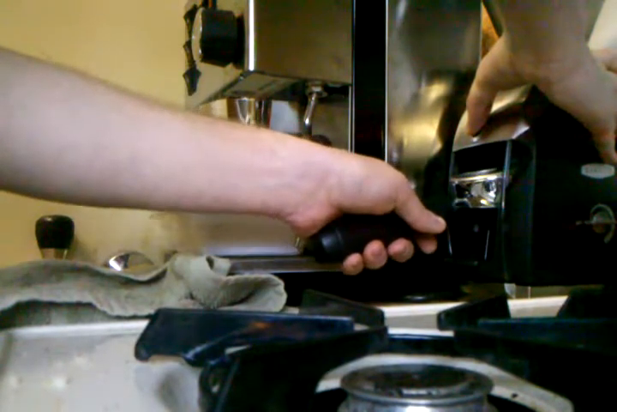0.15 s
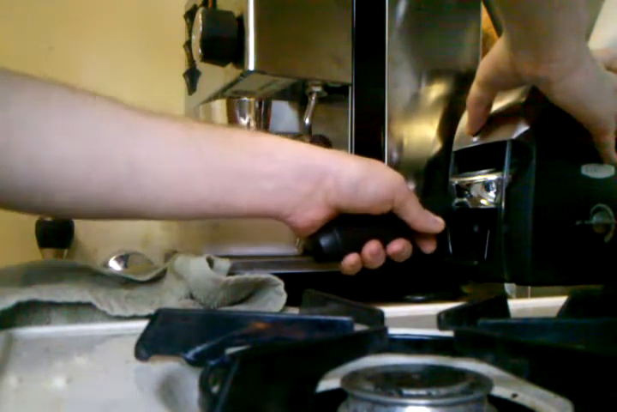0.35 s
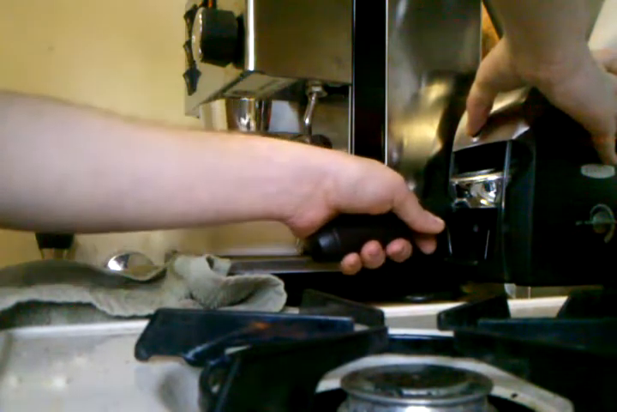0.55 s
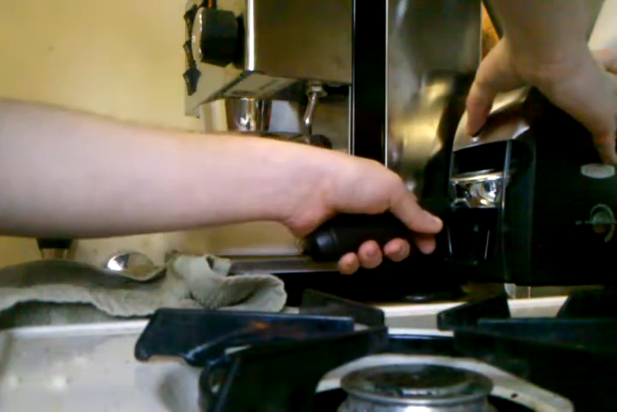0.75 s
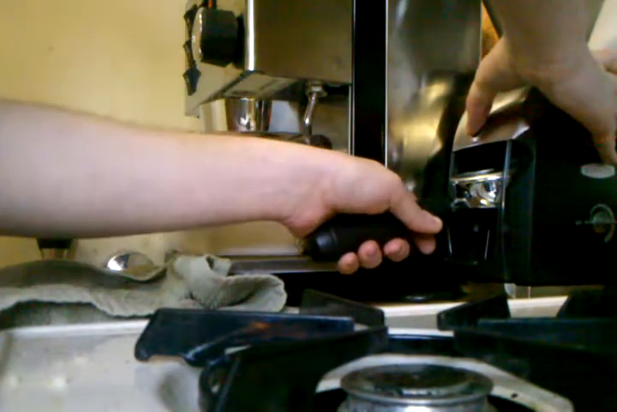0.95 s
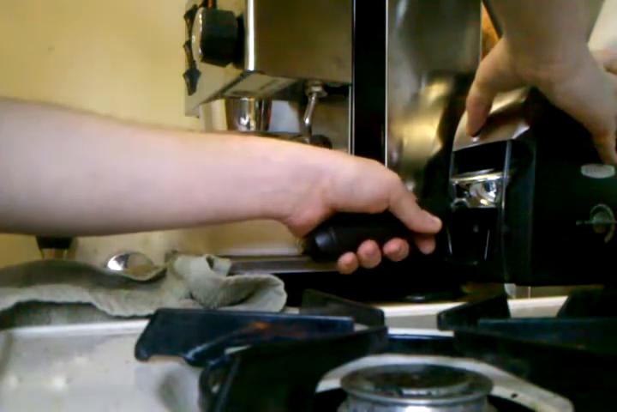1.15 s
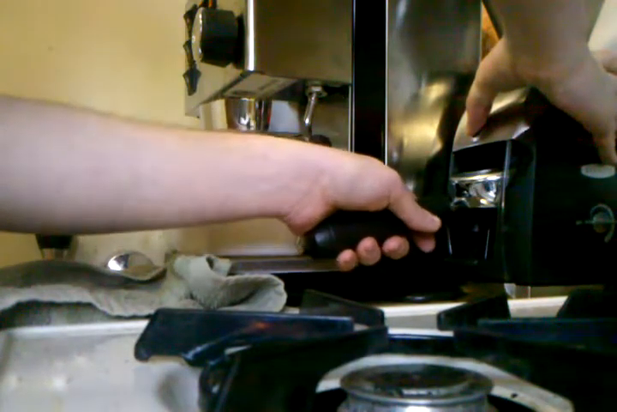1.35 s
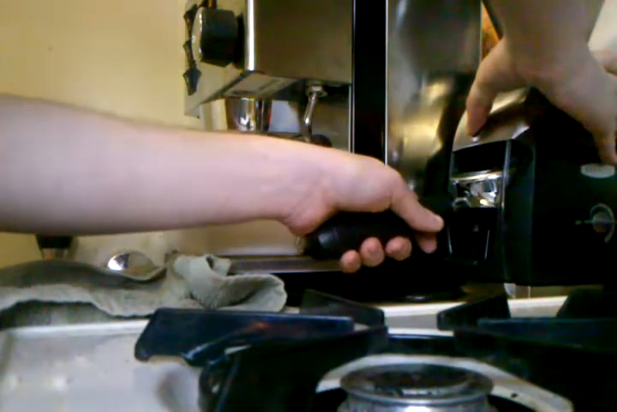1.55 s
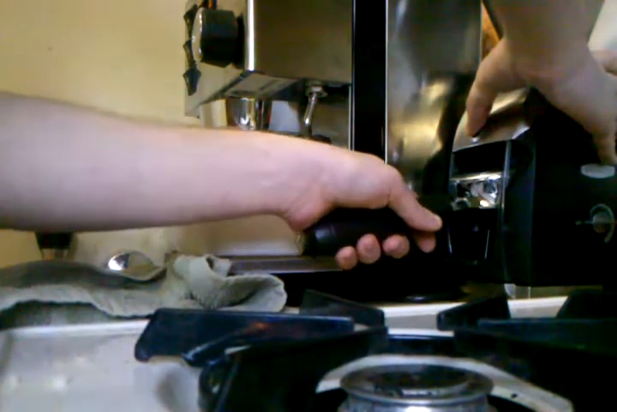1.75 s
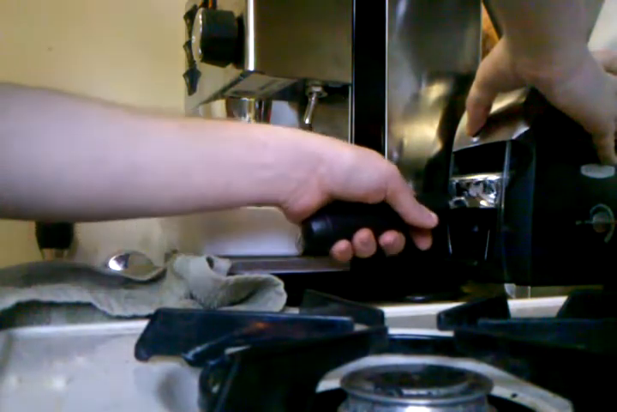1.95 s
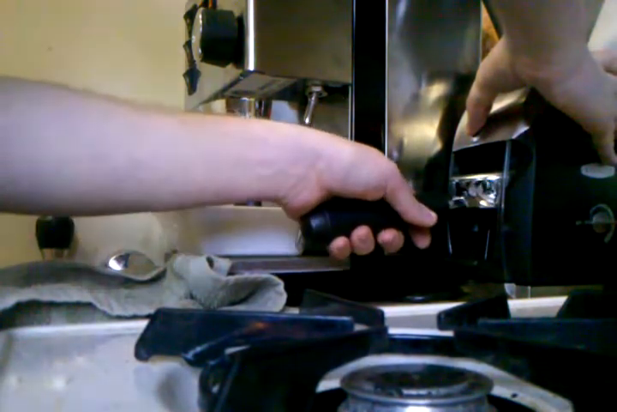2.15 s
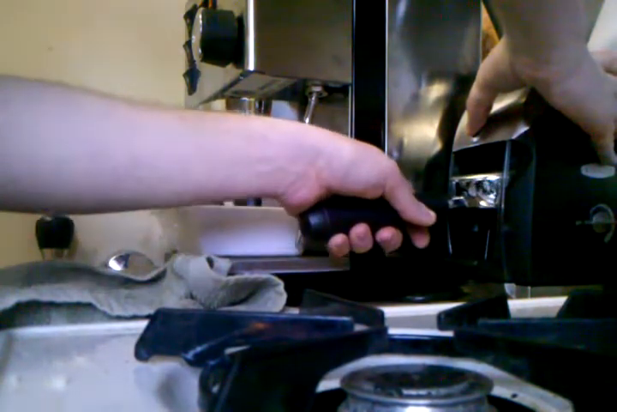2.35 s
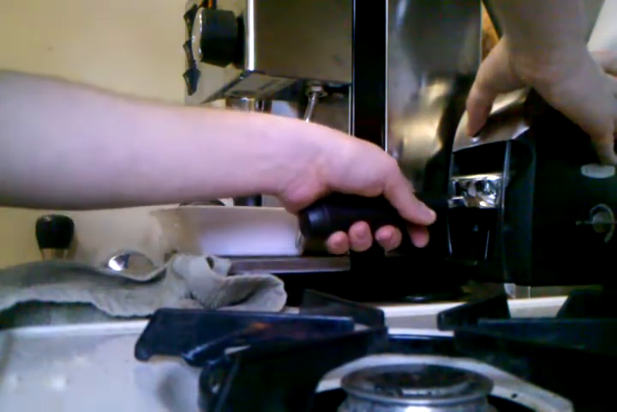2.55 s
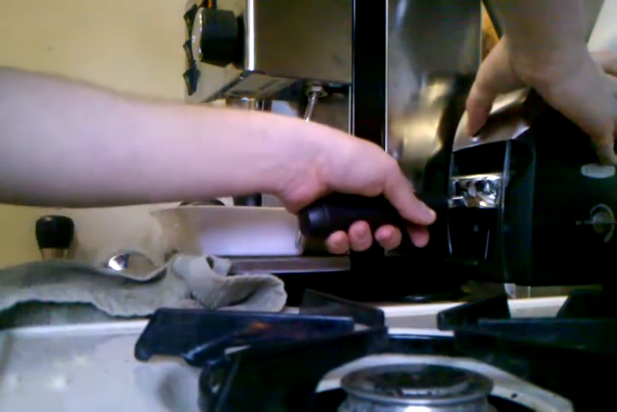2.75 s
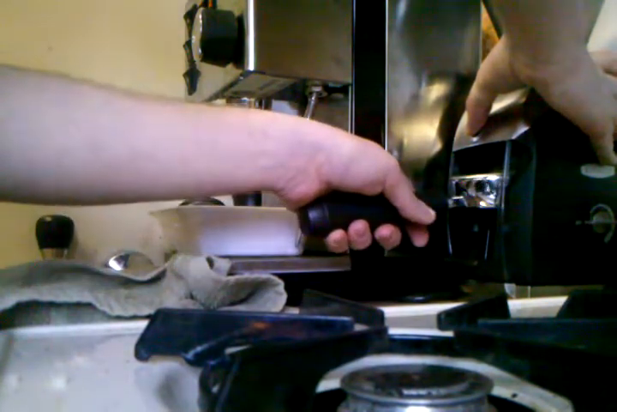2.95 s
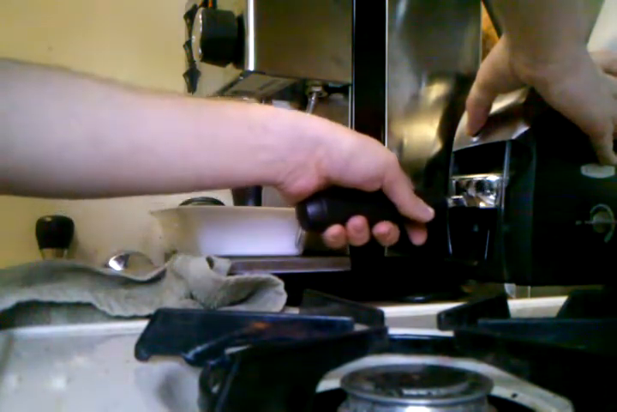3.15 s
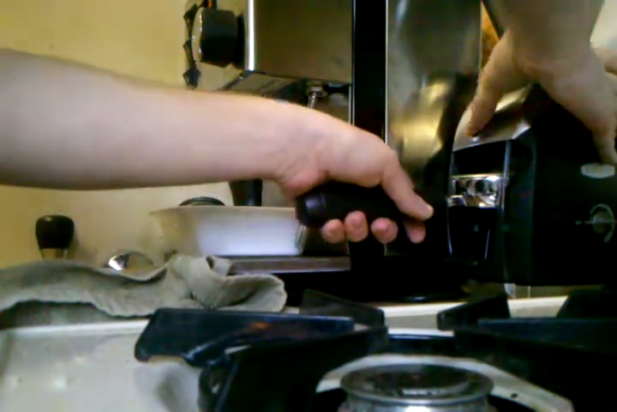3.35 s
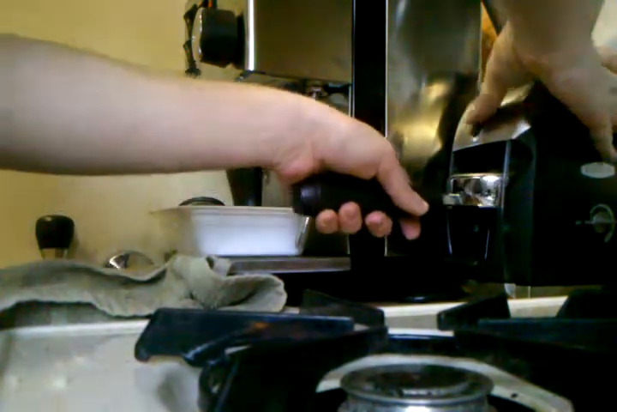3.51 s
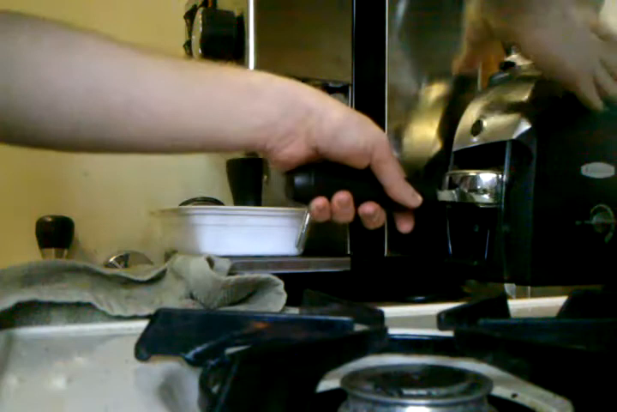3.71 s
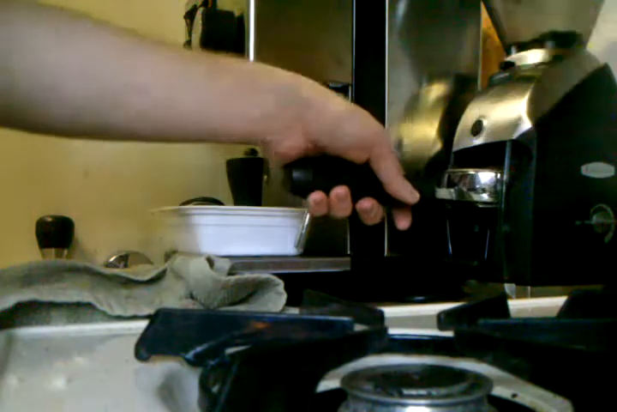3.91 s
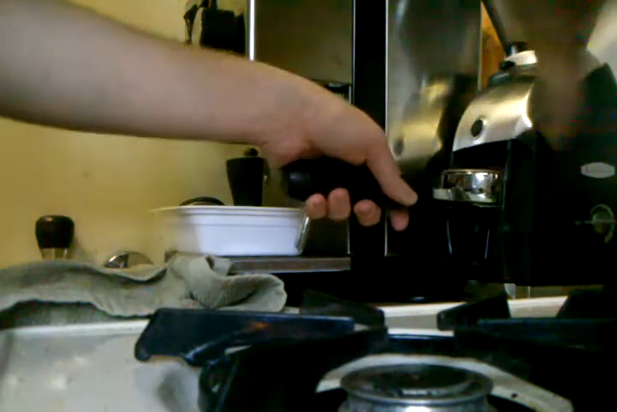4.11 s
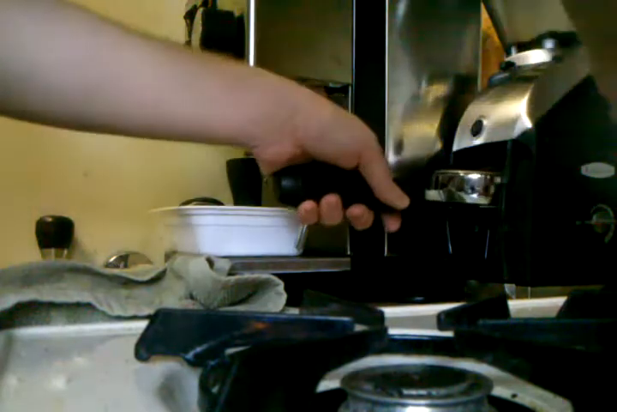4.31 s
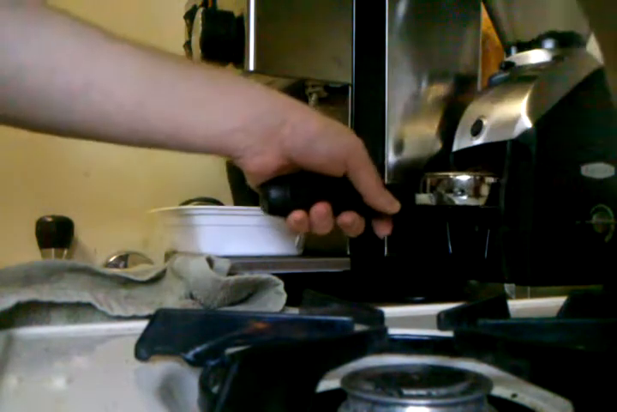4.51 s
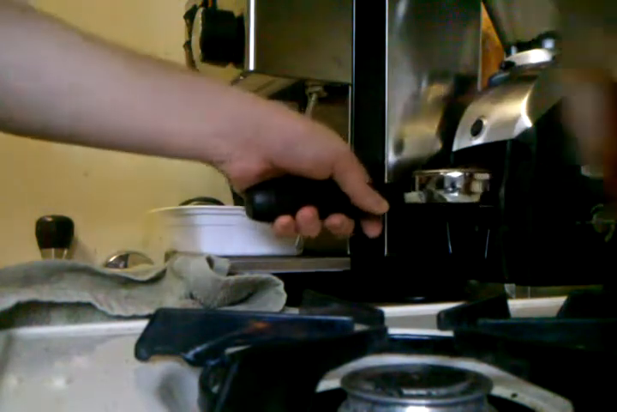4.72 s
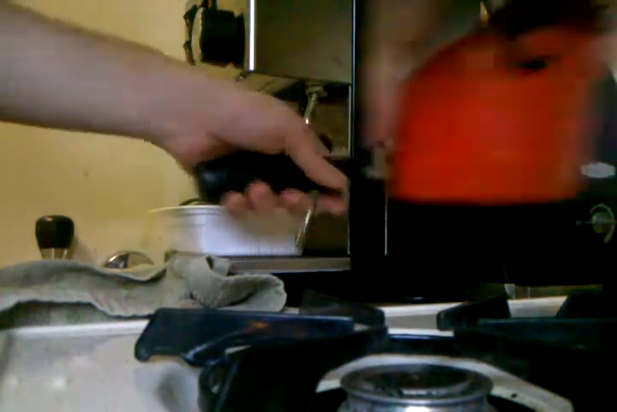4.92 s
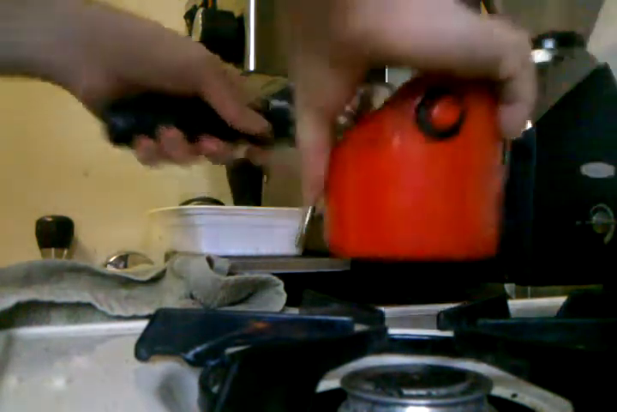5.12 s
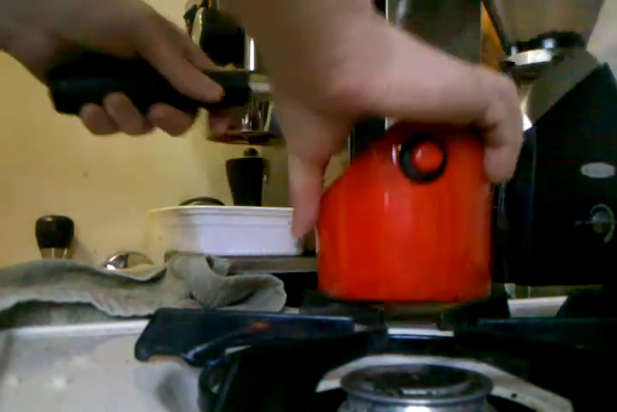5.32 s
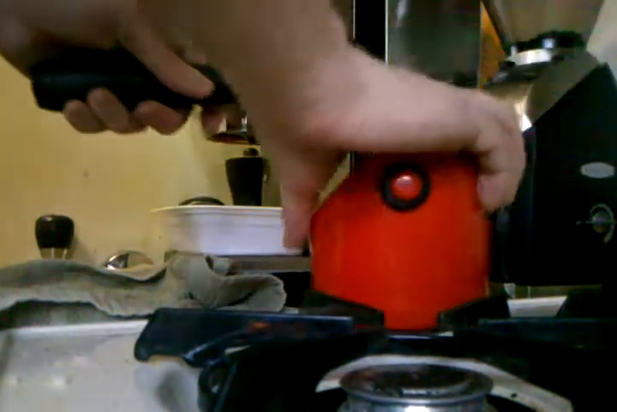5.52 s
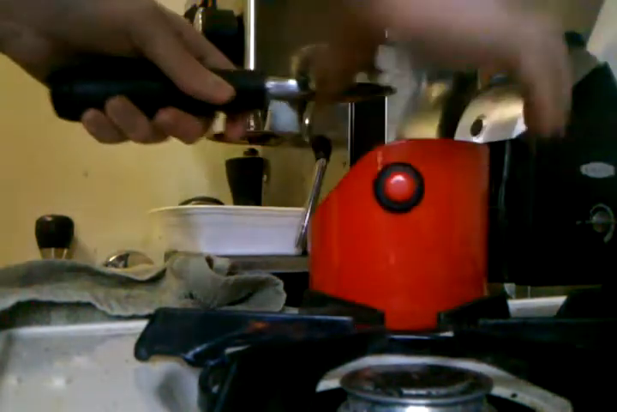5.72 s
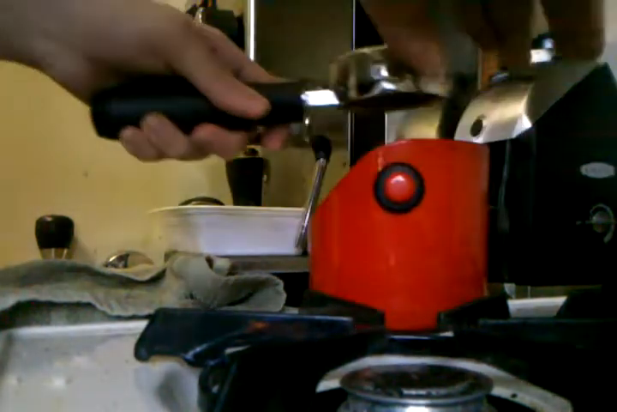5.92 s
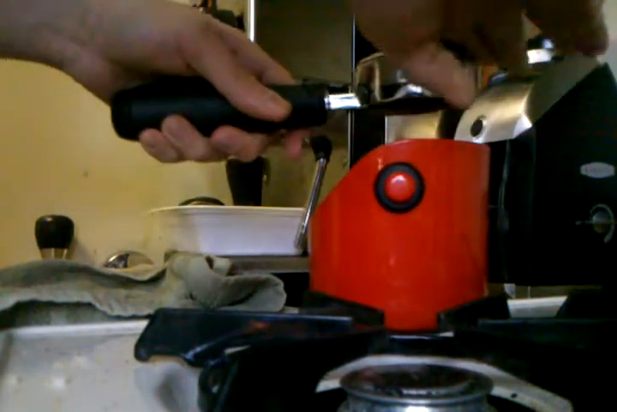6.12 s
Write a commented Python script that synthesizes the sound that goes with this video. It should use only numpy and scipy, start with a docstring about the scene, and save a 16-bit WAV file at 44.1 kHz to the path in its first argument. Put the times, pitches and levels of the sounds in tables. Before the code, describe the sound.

Close, harsh coffee grinding with a wavering motor whine stops abruptly; quiet clicks, a sharp steel knock, then a heavy thud and clank follow.

```python
"""An electric burr grinder chews coffee beans: its motor whine sags and recovers, the crunch rings in its housing.
It runs down and the button clicks back. The steel filter holder knocks on its way out, and a heavy tub is set down
on the stove grate and rocks once. A small kitchen with a low hum; a narrow-band microphone clips the hardest peaks.
Motor: harmonics through resonances. Grinding: filtered random impulses and noise. Knocks: noise bursts, ringing modes."""
import sys
import numpy as np
from scipy import signal
from scipy.fft import rfft, irfft, next_fast_len
from scipy.io import wavfile
from scipy.ndimage import map_coordinates

SR = 44100
rng = np.random.default_rng(int(sys.argv[2]) if len(sys.argv) > 2 else 0)


def generate_wav(signal):
    """Clip the signal to [-1, 1] and save it as 16-bit WAV at the path in sys.argv[1]."""
    frames = np.transpose(np.atleast_2d(signal))
    scaled = np.clip(frames, -1, 1) * 32767
    pcm = np.round(scaled).astype(np.int16)
    wavfile.write(sys.argv[1], SR, pcm)


N = 276507
STOP_S = 3.64  # the current is cut

# colour of a hard click or contact: f/Hz, level/dB per Hz
CLACK = [(250, -12.5), (680, 6.5), (1000, -5.5), (1550, 2), (2400, -3.5), (3000, -0.5), (3330, 3),
         (3900, 0), (4480, 5), (5000, -0.5), (5700, -2), (6300, -2), (9000, -20.5)]


def amp(db):
    """Decibels to amplitude."""
    return 10 ** (np.asarray(db) / 20)


def unit(x):
    """x scaled to rms 1."""
    return x / np.sqrt(np.mean(x ** 2) + 1e-20)


def clock():
    """Time of every sample in seconds."""
    return np.arange(N) / SR


def along(points, hz):
    """Interpolate (Hz, value) points on a log frequency axis."""
    f, v = np.transpose(points)
    return np.interp(np.log(hz + 1), np.log(f + 1), v)


def curves(rows):
    """One value per sample for each column after the time."""
    s, *cols = np.transpose(rows)
    return [np.interp(clock(), s, c) for c in cols]


def wobble(rate):
    """A smooth random curve through normally distributed knots, rate knots a second."""
    s = np.arange(0, N / SR, 1 / (8 * rate))
    knots = rng.standard_normal(int(N * rate / SR) + 4)
    return np.interp(clock(), s, map_coordinates(knots, [s * rate]))


def filtered(x, response):
    """x shaped by a response given as a function of frequency."""
    m = next_fast_len(len(x) + 8192)  # padded so that the filter's tail does not wrap round
    return irfft(rfft(x, m) * response(np.fft.rfftfreq(m, 1 / SR)), m)[:len(x)]


def coloured(x, spectrum):
    """x shaped by a (Hz, dB) spectrum, at rms 1."""
    return unit(filtered(x, lambda hz: amp(along(spectrum, hz))))


def add(track, s, sound):
    """Mix a sound into the track at s seconds."""
    part = track[round(s * SR):][:len(sound)]
    part += sound[:len(part)]


def fractures(rate, spread_db):
    """Randomly timed impulses, rate a second, of random sign and size, at rms 1."""
    happens = rng.random(N) < rate / SR
    sign = rng.choice([-1, 1], N)
    size = amp(spread_db * np.clip(rng.standard_normal(N), -2.5, 2.5))
    return unit(happens * sign * size)


def burst(spectrum, t60, attack):
    """A dense cluster of resonances, as coloured noise that starts sharply and dies away."""
    t = np.arange(SR // 2) / SR
    return coloured(rng.standard_normal(len(t)), spectrum) * amp(-60 * t / t60) * (1 - np.exp(-t / attack))


def ring(modes, blows):
    """Damped modes (Hz, dB, t60 s) struck by (s, dB) blows."""
    t = np.arange(2 * SR) / SR
    response = np.zeros(len(t))
    for hz, db, t60 in modes:
        response += amp(db - 60 * t / t60) * np.sin(2 * np.pi * hz * t) * rng.choice([-1, 1])
    out = np.zeros(N)
    for s, db in blows:
        add(out, s, amp(db) * response)
    return out


def coasting():
    """Seconds since the current was cut."""
    return np.maximum(clock() - STOP_S, 0)


def background():
    """A low appliance hum of wavering sines over quiet coloured room noise."""
    # hum partials: f/Hz, level/dB rms
    hum_partials = [(199.2, -58.5), (351, -63.5), (398.4, -67)]
    # colour of the room noise: f/Hz, level/dB per Hz
    air = [(30, -31), (80, -15), (120, -0.5), (180, 3.5), (240, -4.5), (330, -5), (450, -7), (1250, -12.5),
           (1600, -18.5), (2500, -23.5), (5000, -19), (6700, -17.5), (9000, -42.5)]
    hum = np.zeros(N)
    for hz, db in hum_partials:
        hum += np.sqrt(2) * amp(db) * np.sin(2 * np.pi * hz * clock() + .15 * wobble(14))
    return hum + amp(-59 + .6 * wobble(4)) * coloured(rng.standard_normal(N), air)


def motor_speed():
    """Motor tone in Hz: it sags under load, shudders as beans catch, and slows once the current is cut."""
    # motor tone dragged down by the beans, before shudder and run-down: t/s, f/Hz
    loaded_speed = [(0.0, 371.8), (0.2, 384), (0.52, 363.8), (0.56, 396), (0.68, 381), (0.88, 388.2),
                    (0.96, 369.6), (1.04, 386.4), (1.32, 399), (1.4, 371), (1.48, 368), (1.52, 348),
                    (1.64, 339.2), (1.8, 380), (1.88, 370.6), (2.2, 406.3), (2.32, 383.3), (2.48, 403.3),
                    (2.56, 380), (2.76, 379.3), (2.84, 393), (3.12, 357.2), (3.36, 385.6), (3.62, 371)]
    coast_s = .4  # time constant of the slowing rotor
    shudder = .009 * wobble(60)
    return curves(loaded_speed)[0] * np.exp(-coasting() / coast_s) * (1 + shudder)


def motor(speed, phase):
    """Three fluttering harmonics, each swelling as the speed carries it through a panel resonance."""
    # harmonics 1 to 3 and the panel resonance each meets: level/dB at resonance, f/Hz, width/Hz
    harmonics = [(-28.5, 375.3, 25.6), (-35, 755, 150), (-31, 1090, 36)]
    rise_s, fade_db = .12, 520  # build-up (s); fade after the stop (dB per s)
    judder = .17 * wobble(120)  # radians
    whine = np.zeros(N)
    for k, (db, hz, width) in enumerate(harmonics, 1):
        resonance = 1 / np.hypot(1, 2 * (k * speed - hz) / width)
        flutter_db = 2.9 * wobble(22.014)
        whine += amp(db + flutter_db) * resonance * np.sin(k * (phase + judder))
    return np.sqrt(2) * whine * np.minimum(clock() / rise_s, 1) ** 2 * amp(-fade_db * coasting())


def grinding(phase):
    """Fragments rattle the housing and crackle in clumps; they and the gear teeth set the burrs singing."""
    # how full the burrs are, as grinding level about its average: t/s, level/dB
    load = [(0.0, -1.8), (0.48, -2), (0.56, -1), (0.68, 0.2), (0.76, -4), (1.0, -0.2), (1.32, -1.5),
            (1.52, 2.1), (1.88, -0.5), (1.96, -1.5), (2.6, 1.2), (2.68, -1.8), (3.12, 2.5), (3.62, -1.4)]
    # colour of the rattle: f/Hz, level/dB per Hz
    rattle_colour = [(50, -52), (85, -22), (110, -9.5), (140, -9.5), (250, -5), (330, -3), (480, 0),
                     (620, -2.5), (800, -2), (1150, -1.5), (1300, -7), (1600, -12), (2600, -15.5),
                     (3600, -48)]
    # peaks and dips of the housing: f/Hz, width/Hz, level/dB
    housing_bells = [(144, 15, 8), (316, 25, 4), (420, 50, -3), (426.6, 21, -6), (477, 23, 4.5),
                     (617, 54, -4.5), (698, 29, 5.5), (936, 70, 2.5), (1160, 130, 4.5), (1429, 37, 6)]
    # colour of the crunch: f/Hz, level/dB per Hz
    crunch_colour = [(900, -32.5), (1700, -4), (2700, -2.5), (3200, 5.5), (4400, 2), (5300, -1), (6400, -4),
                     (6900, -1.5), (9000, -12.5)]
    # resonances of the singing burrs: f/Hz, width/Hz, level/dB
    burr_modes = [(3190, 130, -10), (3533, 100, 0), (3782, 170, -1.5), (4660, 250, -13.5)]
    full_db = 2.5  # load above which the singing of the burrs grows no further

    def housing(hz):
        return amp(sum(db / (1 + ((hz - c) / (width / 2)) ** 2) for c, width, db in housing_bells))

    def burr(hz):
        response = 0
        for k, (c, width, db) in enumerate(burr_modes):
            damping = 1j * hz * width
            response = response + (-1) ** k * amp(db) * damping / (c * c - hz * hz + damping)
        return response

    load_db, off = curves(load)[0] + 0.88 * wobble(16), coasting()
    # level at 0 dB load (dB), growth (dB per dB of load), fade after the stop (dB per s), wobble (dB)
    rattle_db = -22.5 + .1 * load_db - 238 * off + 0.69 * wobble(14)
    scrape_db = -33 + 1.4 * np.minimum(load_db, full_db) - 400 * off + 2.1 * wobble(16)
    crunch_db = -28 + 0.55 * load_db - 350 * off + 0.97 * wobble(14)

    clumps = amp(1.46 * wobble(90))
    rattle = unit(filtered(fractures(rate=5000, spread_db=2.5),
                           lambda hz: amp(along(rattle_colour, hz)) * housing(hz)))
    # ten teeth pass unevenly in each cycle of the motor tone
    teeth = amp(-15) * np.sin(10 * phase + .55 * wobble(150)) * amp(3 * wobble(70))
    scrape = unit(filtered(fractures(rate=3300, spread_db=0.5) * clumps + teeth, burr))
    powder = .7 * rng.standard_normal(N)
    crunch = coloured(clumps * (fractures(rate=2500, spread_db=2.0) + powder), crunch_colour)
    return amp(rattle_db) * rattle + amp(scrape_db) * scrape + amp(crunch_db) * crunch


def chips(count):
    """Bits of bean flick against the chamber: short decaying sines with noise, random in pitch and size."""
    out, t = np.zeros(N), np.arange(SR // 30) / SR
    for when, pitch, size in rng.random((count, 3)):
        hz = 2500 + 3000 * pitch
        tick = np.sin(2 * np.pi * hz * t) + 0.62 * rng.standard_normal(len(t))
        add(out, when * STOP_S, amp(-32.0 + 8.4 * size - 60 * t / 0.025) * tick)
    return out


def bean_bursts():
    """Whole beans burst loudly between the burrs, each a very short noise burst."""
    # bursting beans: t/s, level/dB
    beans = [(0.019, -15), (0.105, -22), (0.477, -21), (0.703, -25), (1.385, -19.5), (1.569, -20.5),
             (1.631, -17), (1.68, -22), (1.779, -17), (1.862, -19), (1.914, -13), (1.974, -19.5),
             (2.544, -20.5), (2.766, -15.5), (3.445, -21)]
    # colour of a bursting bean: f/Hz, level/dB per Hz
    crack = [(500, -18.5), (1500, -13), (2400, 0.5), (3300, -2.5), (3900, -6.5), (4600, 0), (5300, -6.5),
             (7000, -9), (9000, -19)]
    out = np.zeros(N)
    for s, db in beans:
        add(out, s, amp(db) * burst(crack, t60=0.038, attack=0.00035))
    return out


def body_ring():
    """The grinder's body modes ring on after the stop."""
    # modes of the body, relative level: f/Hz, level/dB, t60/s
    body = [(153.8, -3.5, 0.42), (248, -0.5, 0.66), (820, -22, 1.5), (1814, -23.5, 1.16),
            (3704, -19.5, 1.12)]
    return amp(-32.5) * ring(body, [(STOP_S, 0)])


def light_clicks():
    """The button and the holder click: short bright noise bursts."""
    # light clicks: t/s, level/dB
    clicks = [(3.777, -40.5), (3.832, -42), (3.991, -59), (4.167, -58), (4.453, -52), (4.472, -42.5),
              (4.504, -44.5), (5.884, -49), (6.086, -56)]
    out = np.zeros(N)
    for s, db in clicks:
        add(out, s, amp(db) * burst(CLACK, t60=0.058, attack=.0004))
    return out


def knocks(table, metal):
    """Each blow thuds in the counter (soft contact is duller), clacks at the contact and leaves the metal ringing."""
    # modes of the counter top, relative level: f/Hz, level/dB, t60/s
    counter = [(120, -8.5, 0.39), (144.5, -6, 0.3), (212, -8.5, 0.18), (254, 1, 0.18), (307, -4, 0.24)]
    # colour of the thud: f/Hz, level/dB per Hz
    thud_colour = [(40, -19.5), (75, -15), (125, -10), (190, -3), (270, 1.5), (440, -6), (660, -2.5),
                   (950, -9), (1600, -5), (4000, -31)]
    # thud bandwidth when clack and thud are equal (Hz); extra clack that doubles it (dB)
    equal_hz, doubling_db = 1150, 19.5
    blows = np.array(table)
    out = amp(-12) * ring(counter, blows[:, [0, 1]]) + ring(metal, blows[:, [0, 3]])
    for s, thud_db, clack_db, _ in table:
        contact_hz = equal_hz * 2 ** ((clack_db - thud_db) / doubling_db)

        def softness(hz):  # second-order low-pass
            return 1 / (1 + 1j * np.sqrt(2) * hz / contact_hz - (hz / contact_hz) ** 2)

        thud = filtered(burst(thud_colour, t60=0.17, attack=0.0032), softness)
        add(out, s - .002, amp(thud_db) * thud)
        add(out, s, amp(clack_db) * burst(CLACK, t60=0.095, attack=0.0015))
    return out


def button_and_holder_knocks():
    """The grinder's button releases with a few dull knocks; then hand and steel filter holder knock on the
    grinder and the steel rings."""
    # blows: t/s, thud level/dB, clack level/dB, holder ring level/dB
    blows = [(3.833, -36, -44, -71), (3.879, -47, -54, -72), (3.922, -46, -60, -79), (4.476, -25, -52, -78),
             (4.521, -35.5, -68, -90.5), (4.556, -33, -52, -75), (4.565, -21, -18.5, -49.5),
             (4.577, -15.5, -17, -28), (4.596, -24.5, -29, -43.5)]
    # modes of the holder, relative level: f/Hz, level/dB, t60/s
    holder = [(818, -34.5, 1.5), (888, -38.5, 1.3), (1156, -29, 3), (1494, -1, 0.25), (1550, -35, 1.8),
              (1770, -1, 0.16), (1970, -21, 0.63), (3390, -12, 0.17), (3478, -6, .17), (4468, -14, .19),
              (5000, -18, .18), (5700, -24.5, 0.74)]
    return knocks(blows, holder)


def rub():
    """A faint, brief squeak of narrow-band noise as the tub is lifted over."""
    swell = np.exp(-((clock() - 4.99) / 0.064) ** 2)
    return amp(-63) * swell * coloured(rng.standard_normal(N), [(750, -38), (910, 2), (970, -2), (1150, -40)])


def tub_knocks():
    """The tub touches, lands, rocks and settles, and the stove grate rings under it."""
    # blows: t/s, thud level/dB, clack level/dB, grate ring level/dB
    blows = [(5.668, -14.5, -30, -57), (5.672, -15, -4.5, -25), (5.686, -14, -14, -41),
             (5.765, -17.5, -19.5, -30), (5.994, -26.5, -60.5, -71)]
    # modes of the grate, relative level: f/Hz, level/dB, t60/s
    grate = [(639, 1.5, 0.18), (706, -2, 0.36), (907, -21.5, .7), (1475, -10, 0.28), (1980, -22, 0.4),
             (2230, -12.5, 0.31), (2630, -16, .2), (3252, -11.5, .48), (4470, 1, 0.1), (5720, -26.5, 0.79),
             (5745, -23.5, .7), (6320, -36, .6)]
    return knocks(blows, grate)


def kitchen(x):
    """The room's answer: a noise tail, 5 ms late, in which each frequency dies at its own speed."""
    # reverberation of the kitchen: f/Hz, t60/s
    decay = [(120, 0.82), (400, 0.35), (1500, 0.25), (6000, 0.22)]
    hz, t, z = signal.stft(rng.standard_normal(SR), SR, nperseg=256)
    fading = z * amp(-60 * t / along(decay, hz)[:, None])
    tail = signal.istft(fading, SR, nperseg=256)[1]
    return signal.fftconvolve(x, np.pad(tail, (SR // 200, 0)) / np.linalg.norm(tail))[:N]


def scene():
    """The grinder, then the holder and the tub, close by in a small kitchen."""
    speed = motor_speed()
    phase = 2 * np.pi * np.cumsum(speed) / SR
    grinder = motor(speed, phase) + grinding(phase) + chips(count=60) + bean_bursts() + body_ring()
    near = grinder + light_clicks() + button_and_holder_knocks() + rub() + tub_knocks()
    return (near + amp(-14) * kitchen(near) + background())[None]


def record(dry):
    """The microphone loses the highest treble, then clips on the hardest peaks."""
    # microphone response: f/Hz, level/dB
    microphone = [(35, -14.5), (65, -9), (110, -0.5), (6950, 0.5), (7350, -13), (7900, -26.5),
                  (9000, -28.5), (9600, -67.5)]
    top_hz = 16300  # steep upper limit, after the clipping
    x = filtered(dry[0], lambda hz: amp(along(microphone, hz)))
    ceiling, hardness = .75, 16  # peak amplitude; sharpness of the clipping knee
    x = x / (1 + np.abs(x / ceiling) ** hardness) ** (1 / hardness)
    return filtered(x, lambda hz: 1 / (1 + (hz / top_hz) ** 120))[None]


dry = scene()
out = record(dry)
generate_wav(out)
```